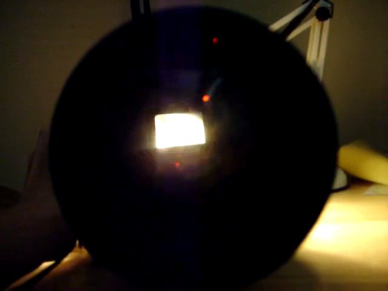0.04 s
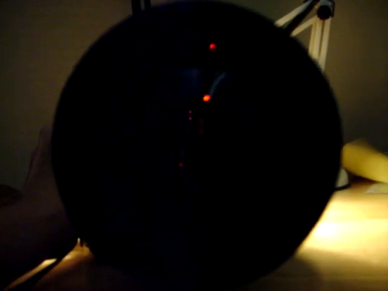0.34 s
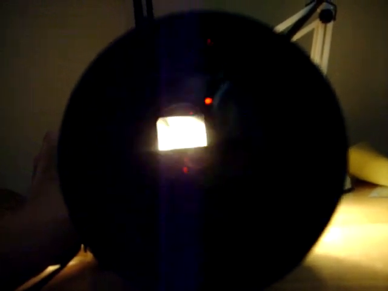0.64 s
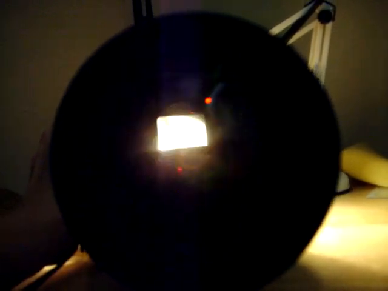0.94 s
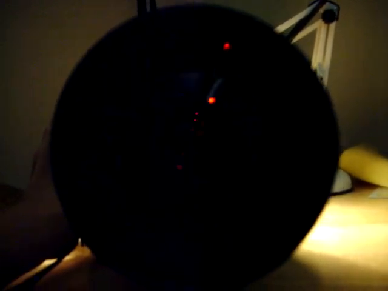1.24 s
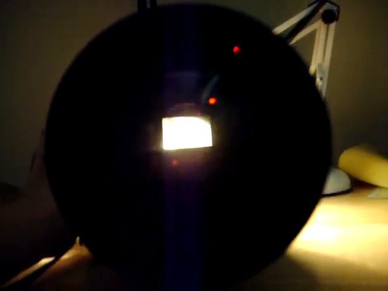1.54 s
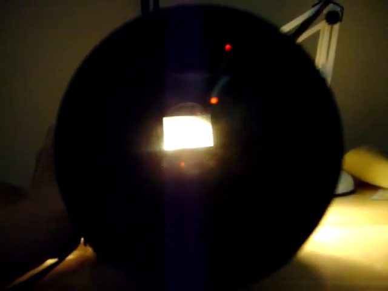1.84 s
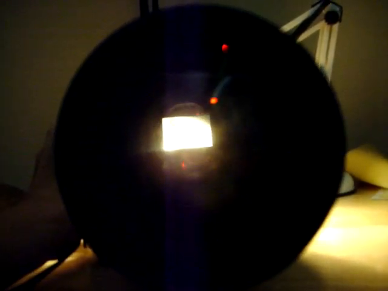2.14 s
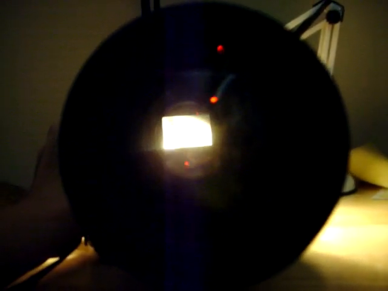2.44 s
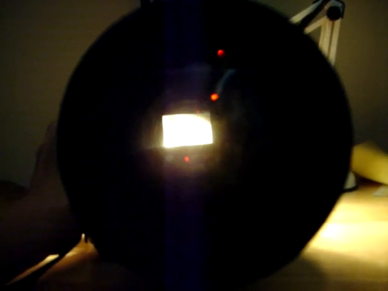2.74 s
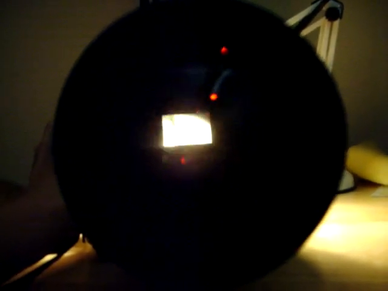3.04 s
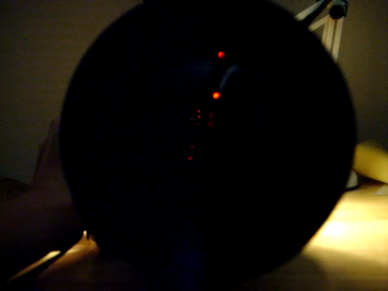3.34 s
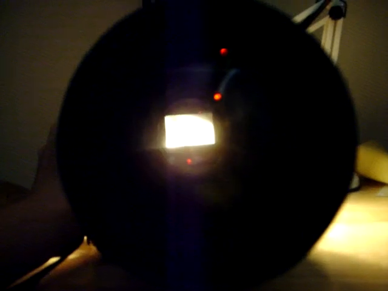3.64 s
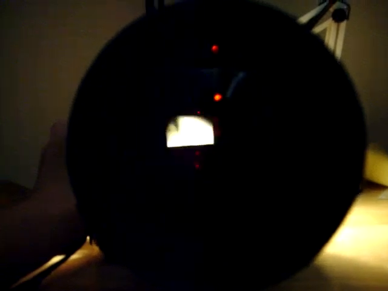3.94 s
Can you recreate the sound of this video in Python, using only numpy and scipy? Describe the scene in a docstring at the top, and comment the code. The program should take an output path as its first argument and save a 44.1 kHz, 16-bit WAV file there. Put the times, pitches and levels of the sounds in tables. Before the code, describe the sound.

A camera shutter clicks and clatters in rapid bursts, close by in a small room.

```python
"""A small room, a reflex camera close to a small microphone, firing bursts of frames.
Every frame is the same run of contacts: three sharp shutter clicks, then the rattle of mirror return
and rewind, closed by a latch. Springs ping and the winding gears rasp along with it.
A fan hums in the background and the electronics give off a thin whine. The microphone's gain
ducks under the clatter and creeps back in the pauses."""
import sys
import numpy as np
from scipy import signal
from scipy.fft import rfft, irfft, next_fast_len
from scipy.io import wavfile
from scipy.ndimage import uniform_filter1d

SR = 44100
rng = np.random.default_rng(int(sys.argv[2]) if len(sys.argv) > 2 else 0)


def file_out(sig):
    """Save sig as 16-bit WAV at sys.argv[1]."""
    # one column per channel
    cols = np.atleast_2d(sig).T
    # limit, then scale
    lim = np.clip(cols, -1, 1)
    pcm = np.round(lim * 32767).astype(np.int16)
    wavfile.write(sys.argv[1], SR, pcm)


N = 176400
LEAD = SR // 10   # samples ahead of time zero on the camera's tracks

# Frames, nearly eight a second while the button is held: start_s
FRAME_STARTS = [-.0072, .1219, .2501, .3791, .5077, .638, .7662, .8952, 1.025, 1.1537, 1.2826, 1.4112,
                1.5401, 1.6691, 2.1585, 2.2877, 2.8604, 2.9894, 3.118, 3.2466, 3.7464, 3.8755]
# Contacts within a frame: delay_s, chatter_decay_s, metal_db, housing_db, thud_db
FRAME_CONTACTS = [(.0001, 0.00092, -3, -13, -15), (.0074, .0006, -3, -15, -18),
                  (.0098, 0.0016, -3.5, -5.5, -41), (0.0144, 0.0016, -4.5, -3, -19.5),
                  (0.0298, .0016, -35, -5, -3.5), (0.043, 0.00067, -36, -9, -10.5),
                  (.048, 0.003, -17, -1.5, -23.5), (0.0523, 0.004, -5.5, -2.5, 3),
                  (.056, 0.0038, -8.5, -4.5, -16), (.061, 0.0034, -15, -7, -1.5),
                  (.065, 0.0017, -14.5, -9, 6), (0.0697, 0.0019, -11, -4, -30),
                  (0.0736, 0.0037, -18, -12, -18), (.0788, .0012, -5.5, -6, -3.5),
                  (0.081, 0.002, -2.5, -1, 2), (0.0844, 0.0028, -5, -10, -14), (.088, 0.0013, -8.5, -5, -4),
                  (.091, 0.0029, -5.5, -4.5, 2), (0.096, .004, -19, -9.5, -3),
                  (.1035, 0.003, -21.5, -6, -14), (.1085, 0.0014, -0.5, -9.5, -12)]
# Resonances of the metal parts: pitch_hz, width_hz, level_db
METAL_MODES = [(1367, 204, -5), (2330, 117, -4.5), (3158, 296, 0), (3444, 300, -0.5), (3752, 520, -3.5),
               (4580, 600, -8), (5464, 820, -10), (6650, 280, -13.5), (7770, 420, -15), (9500, 1900, -51.5)]
# Resonances of the housing: pitch_hz, width_hz, level_db
HOUSING_MODES = [(538, 147, -6.5), (832, 204, -5), (1077, 265, -1.5), (1280, 180, 1.5), (1533, 92, -1.5),
                 (2117, 210, -4.5), (2360, 233, -3.5), (2730, 1400, -11.5), (5540, 2600, -22.5)]
# Low resonances of the camera's bulk: pitch_hz, width_hz, level_db
THUD_MODES = [(81, 6.1, -1), (120.6, 21.7, 0.89), (231, 81, -0.77), (311, 69, 0.31)]
# Strength of the housing's knock through the scene: time_s, gain_db
HOUSING_GAIN = [(.1, 0), (1.0, 1), (1.7, .3), (2.3, -.7), (3.1, -1.3), (3.9, -1.5)]
# Springs and blades that ring once a frame: delay_s, pitch_hz, level_db, t60_s
SPRING_RINGS = [(0, 3330, -6.5, 0.0096), (0, 3650, -2.5, 0.0081), (.0075, 3470, -12.5, 0.0084),
                (.0075, 3670, -3, 0.012), (.0305, 760, -20.5, 0.036), (.043, 615, -13, 0.014),
                (0.0445, 1320, -12.5, 0.043), (.0515, 2270, -4, .015), (0.053, 1480, -7, .025),
                (.0478, 9840, -14.5, 0.01), (0.0618, 7370, -7, 0.0086), (.0615, 10900, -23, 0.0088),
                (.063, 650, -14.5, 0.014), (.069, 1471, -13.5, 0.097), (.079, 1345, -9, 0.066),
                (.0838, 10500, -11, 0.0061), (0.0872, 1525, -13, 0.052), (.089, 2351, -18.5, 0.068),
                (.107, 1167, -18, .018)]
# Colour of the room's tail: frequency_hz, gain_db
ROOM_CURVE = [(100, 2), (500, 2), (1300, 3), (2300, -0.5), (3500, -2.5), (5500, -1.5), (8000, 1.5),
              (12000, -3)]
# Colour of the fan's rush of air: frequency_hz, gain_db
FAN_CURVE = [(20, -21), (35, -9), (70, -9.5), (140, -10), (195, -4), (300, -6.5), (450, -4), (700, -8),
             (1100, -17), (1600, -20.5), (2500, -29), (5000, -46.5), (12000, -65)]
# Tones of the fan: pitch_hz, level_db
FAN_TONES = [(194, -44.5), (230, -50), (431, -55.5), (535, -59)]
# Colour of the gears' rasp: frequency_hz, gain_db
GEAR_CURVE = [(300, -6.5), (1400, 4.5), (2600, -1), (3600, 1.5), (5400, -2.5), (6800, -13), (7800, -10),
              (9000, -14), (12000, -28)]
# Response of the microphone: frequency_hz, gain_db
MIC_CURVE = [(20, -2), (7000, -0.5), (9500, -9), (10800, -7.5), (11600, -11.5), (12400, -38)]

METAL_DB, HOUSING_DB, THUD_DB = 26, 25, 18.5   # gain of each set of resonances
TEMPO_SPREAD, JITTER_S, FORCE_SPREAD_DB = .003, .00012, 1.0   # what changes from frame to frame


def from_db(db):
    return 10 ** (np.asarray(db) / 20)


def rms_one(x):
    return x / np.sqrt(np.mean(x ** 2) + 1e-20)


def coloured(x, curve):
    """Shape a sound by a curve of frequency_hz, gain_db."""
    hz, db = np.transpose(curve)
    size = next_fast_len(2 * len(x))
    bin_hz = np.maximum(np.arange(size // 2 + 1) * SR / size, 1)
    gain = from_db(np.interp(np.log(bin_hz), np.log(hz), db))
    return irfft(rfft(x, size) * gain, size)[:len(x)]


def drift(rate_hz):
    """A slow random wander with a spread near 1."""
    return np.interp(np.arange(N) / SR * rate_hz, np.arange(N // 100), rng.standard_normal(N // 100))


def add(track, start_s, sound):
    """Lay a sound on a track that begins a little before time zero."""
    i = int(start_s * SR) + LEAD
    track[i:i + len(sound)] += sound


def resonate(x, modes):
    """Parallel resonances with alternating signs."""
    out = 0
    for k, (hz, width_hz, db) in enumerate(modes):
        radius = np.exp(-np.pi * width_hz / SR)
        poles = [1, -2 * radius * np.cos(2 * np.pi * hz / SR), radius ** 2]
        ringing = signal.lfilter([1, 0, -1], poles, x + 1e-18)
        out = out + (-1) ** k * from_db(db) * (1 - radius ** 2) / 2 * ringing
    return out


def chatter(decay_s, count, size=1024, fresh_share=0.19):
    """Dying bursts of tiny impacts, one a frame and much alike, each of unit energy."""
    fade = np.exp(-np.arange(size) / SR / decay_s)
    common = np.sqrt(1 - fresh_share) * rng.standard_normal(size)
    fresh = np.sqrt(fresh_share) * rng.standard_normal((count, size))
    spectrum = rfft((common + fresh) * fade)
    force = irfft(spectrum / (np.abs(spectrum) + 1e-12)) * np.sqrt(fade)   # even out the spectrum
    return force / np.sqrt(np.sum(force ** 2, axis=1, keepdims=True))


def contacts(stretches, push_s=0.0024):
    """Close up, each contact chatters into metal and housing and gives the camera's bulk a soft push."""
    metal, housing, bulk = np.zeros((3, N + SR))
    t = np.arange(512) / SR
    push = np.sin(np.pi * np.minimum(t / push_s, 1)) ** 2
    push /= push.sum()
    for delay_s, decay_s, metal_db, housing_db, thud_db in FRAME_CONTACTS:
        bursts = chatter(decay_s, len(FRAME_STARTS))
        for start_s, stretch, burst in zip(FRAME_STARTS, stretches, bursts):
            hit_s = start_s + delay_s * stretch + JITTER_S * rng.standard_normal()
            blows = (metal, burst, metal_db), (housing, burst, housing_db), (bulk, push, thud_db)
            for track, force, db in blows:
                add(track, hit_s, force * from_db(db + FORCE_SPREAD_DB * rng.standard_normal()))
    time_s = (np.arange(N + SR) - LEAD) / SR
    housing *= from_db(np.interp(time_s, *np.transpose(HOUSING_GAIN)))
    click = from_db(METAL_DB) * resonate(metal, METAL_MODES)
    knock = from_db(HOUSING_DB) * resonate(housing, HOUSING_MODES)
    thud = from_db(THUD_DB) * resonate(bulk, THUD_MODES)
    return click + knock + thud


def springs(stretches, attack_s=0.00026, pitch_spread=0.0046):
    """Springs and blades ping briefly as they are released."""
    out, t = np.zeros(N + SR), np.arange(SR // 10) / SR
    for delay_s, hz, db, t60_s in SPRING_RINGS:
        envelope = (1 - np.exp(-t / attack_s)) * from_db(-60 * t / t60_s)
        for start_s, stretch in zip(FRAME_STARTS, stretches):
            force, detune, late = rng.standard_normal(3)
            ping = envelope * np.sin(2 * np.pi * hz * (1 + pitch_spread * detune) * t)
            release_s = start_s + delay_s * stretch + JITTER_S * late
            add(out, release_s, from_db(db + FORCE_SPREAD_DB * force) * ping)
    return out


def room(x, t60_s=0.36, delay_s=0.0014, gain_db=-8):
    """The small room's diffuse tail, reaching the microphone just after the direct sound."""
    t = np.arange(SR // 2) / SR
    tail = rng.standard_normal(len(t)) * from_db(-60 * t / t60_s) * (t > delay_s)
    tail = coloured(tail / np.sqrt(np.sum(tail ** 2)), ROOM_CURVE)
    return from_db(gain_db) * signal.fftconvolve(x, tail)[:len(x)]


def fan(air_db=-35.5, waver_db=3, wander_rad=1.4):
    """A fan in the background: a soft rush of air with a few wavering tones."""
    t = np.arange(N) / SR
    hum = np.zeros(N)
    for hz, db in FAN_TONES:
        amplitude = np.sqrt(2) * from_db(db + waver_db * drift(29))
        hum += amplitude * np.sin(2 * np.pi * hz * t + wander_rad * drift(14))
    air = rms_one(coloured(rng.standard_normal(N), FAN_CURVE))
    return hum + from_db(air_db) * air


def whine(carrier_hz=8204.8, width_hz=700, gain_db=-37, slip_hz=29.97, slip_turns=.33, slip_at_s=.0098):
    """The electronics' thin tone, its phase slipping thirty times a second."""
    t = np.arange(N) / SR
    sawtooth = (t - slip_at_s) * slip_hz % 1
    tone = np.sin(2 * np.pi * (carrier_hz * t + slip_turns * sawtooth))
    return resonate(tone, [(carrier_hz, width_hz, gain_db)])


def gears(delay_s=0.049, run_s=0.072, level_db=-20, grain_db=4):
    """The teeth of the winding gears rasp unevenly through the later part of each frame."""
    running = np.zeros(N + SR)
    for start_s in FRAME_STARTS:
        add(running, start_s + delay_s, signal.windows.tukey(int(run_s * SR), .3))
    teeth = rng.standard_normal(N + SR) * from_db(grain_db * rng.standard_normal(N + SR))
    return from_db(level_db) * running * rms_one(coloured(teeth, GEAR_CURVE))


def gain_control(x, threshold_db=-18, slope=0.53, attack_s=0.0043, release_db_per_s=29.5):
    """The automatic gain ducks quickly under the clatter and creeps back in the pauses."""
    level_db = 10 * np.log10(np.abs(uniform_filter1d(x ** 2, size=128)) + 1e-12)
    wanted_cut_db = slope * np.maximum(level_db - threshold_db, 0)
    release_db = release_db_per_s * np.arange(N) / SR
    held_cut_db = np.maximum.accumulate(wanted_cut_db + release_db) - release_db
    pole = np.exp(-1 / (attack_s * SR))
    return x * from_db(-signal.lfilter([1 - pole], [1, -pole], held_cut_db))


def scene(hiss_db=-48.5):
    """The camera close by in its room, over fan, whine and hiss."""
    stretches = 1 + TEMPO_SPREAD * rng.standard_normal(len(FRAME_STARTS))   # each frame's time scale
    camera = contacts(stretches) + springs(stretches) + gears()
    hiss = from_db(hiss_db) * rng.standard_normal(N)
    camera_in_room = (camera + room(camera))[LEAD:LEAD + N]
    return (camera_in_room + fan() + whine() + hiss)[None]


def record(dry, peak_limit=.8, cutoff_hz=13000, dc_offset=.06):
    """One small microphone with gain control, a dull top, rounded peaks and a steady offset."""
    heard = coloured(gain_control(dry[0]), MIC_CURVE)
    rounded = heard / (1 + (heard / peak_limit) ** 6) ** (1 / 6)
    lowpass = signal.cheby2(14, 60, cutoff_hz, fs=SR, output="sos")
    return signal.sosfilt(lowpass, rounded)[None] + dc_offset


dry = scene()
out = record(dry)
file_out(out)
```